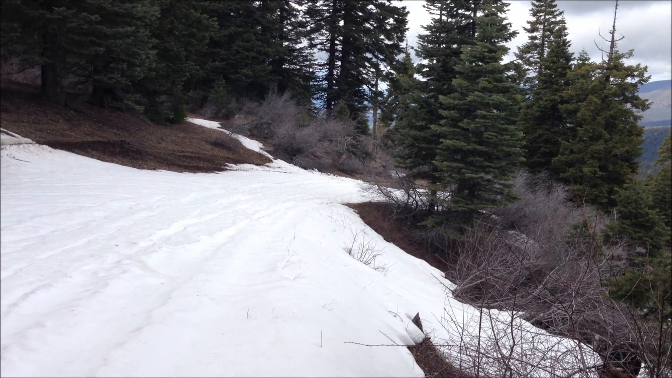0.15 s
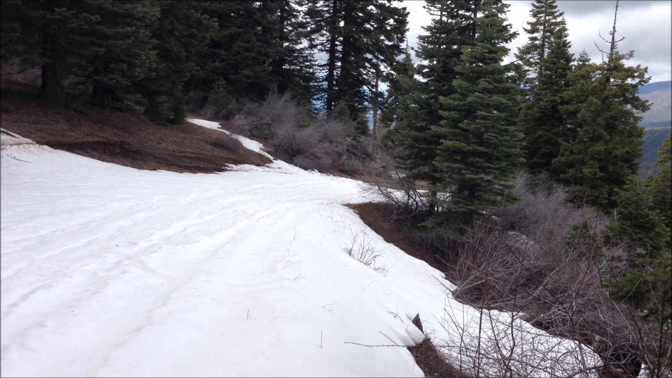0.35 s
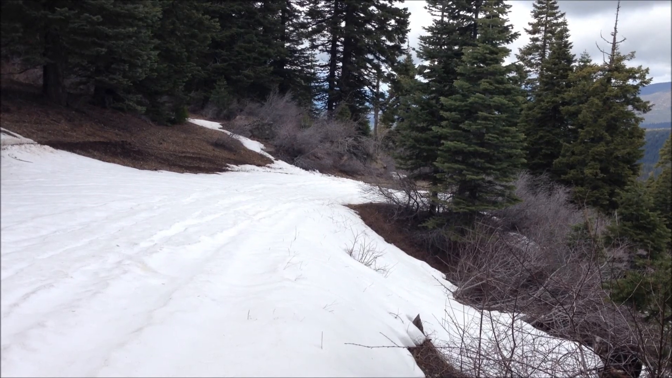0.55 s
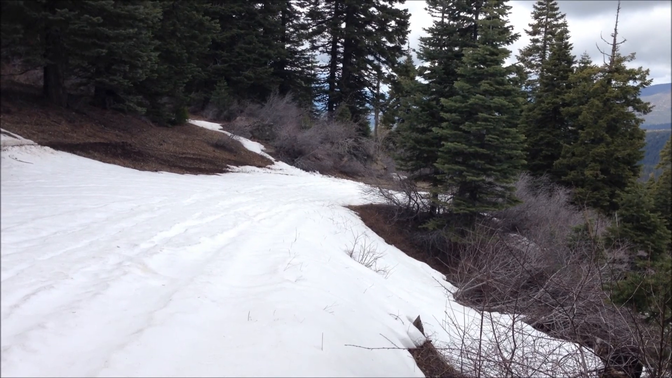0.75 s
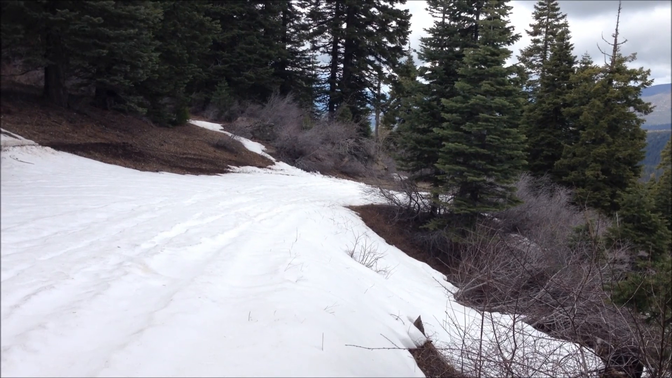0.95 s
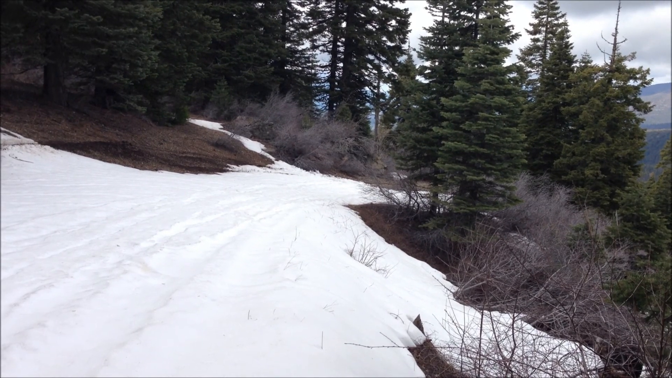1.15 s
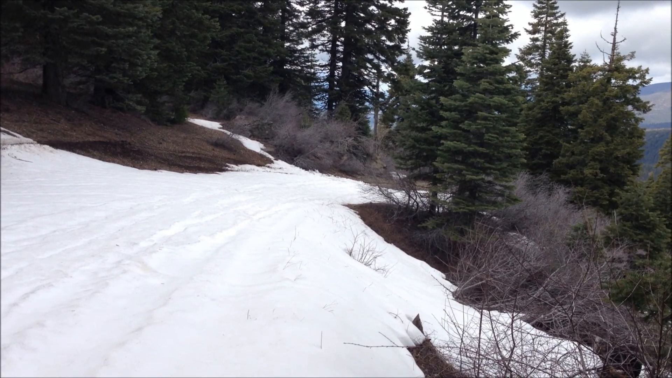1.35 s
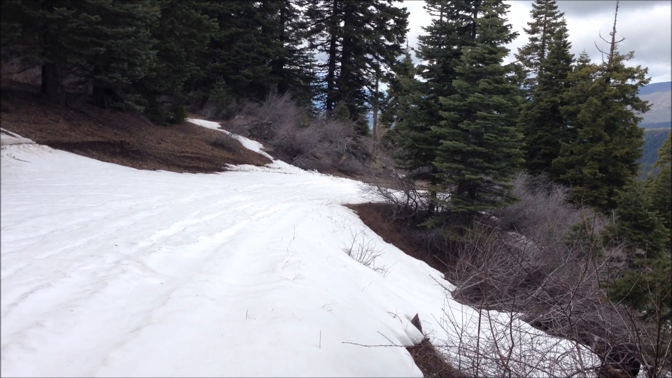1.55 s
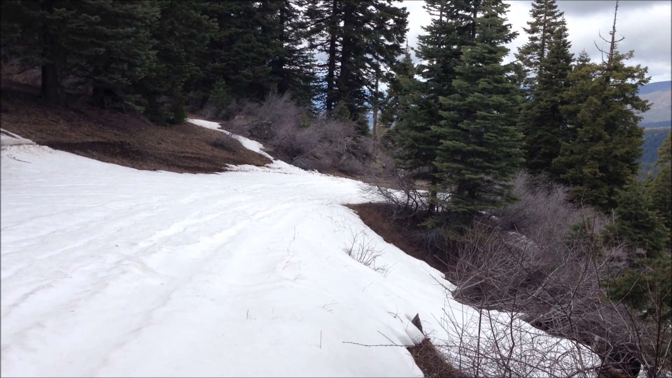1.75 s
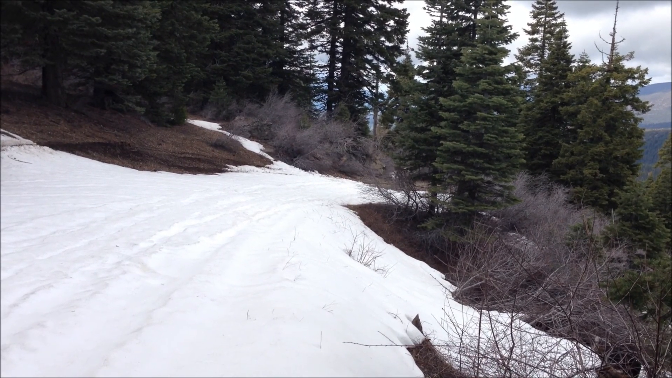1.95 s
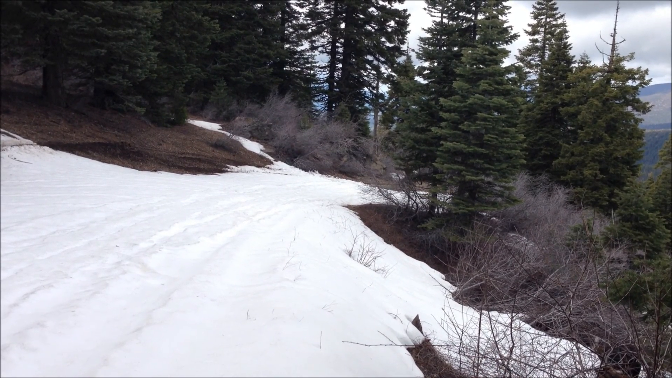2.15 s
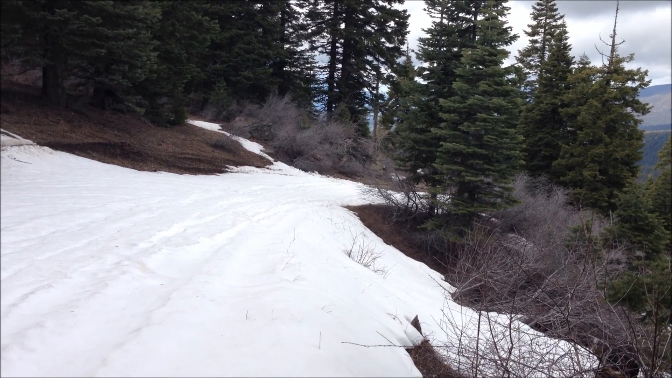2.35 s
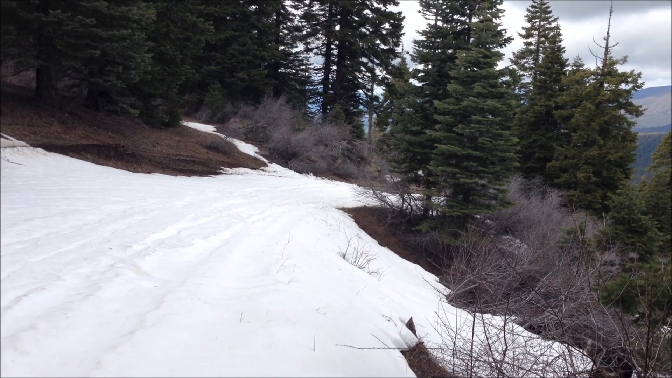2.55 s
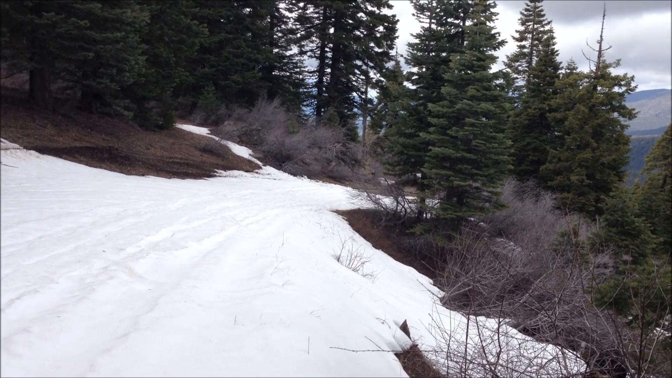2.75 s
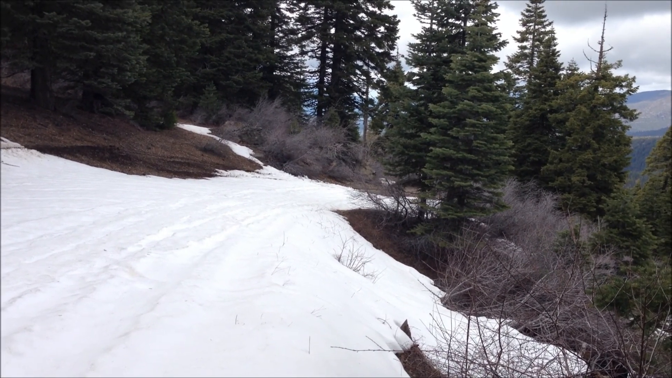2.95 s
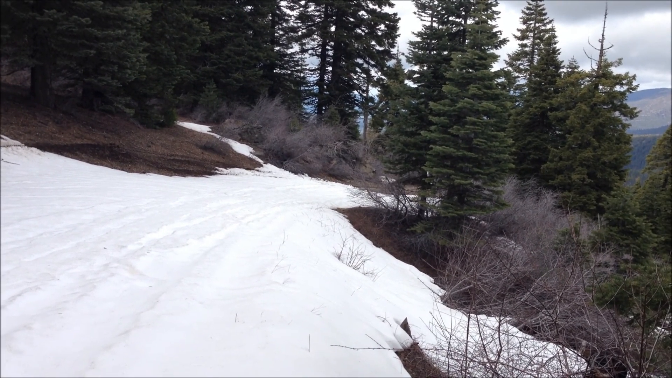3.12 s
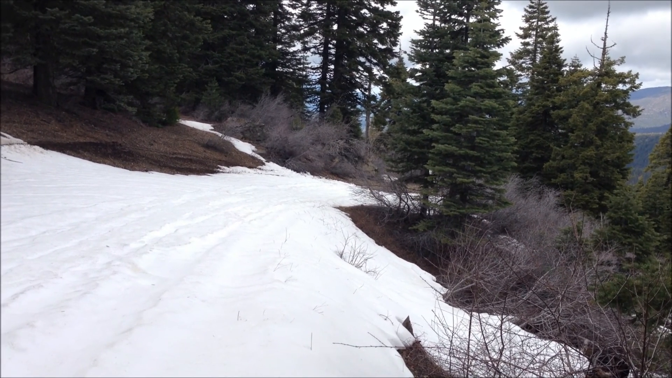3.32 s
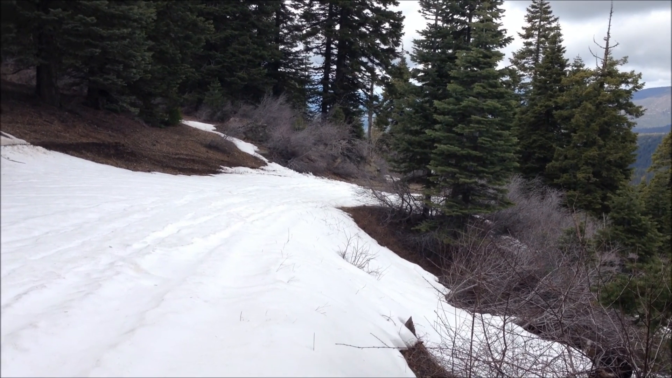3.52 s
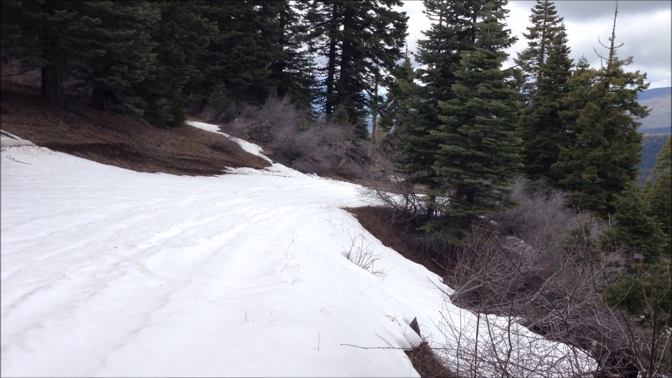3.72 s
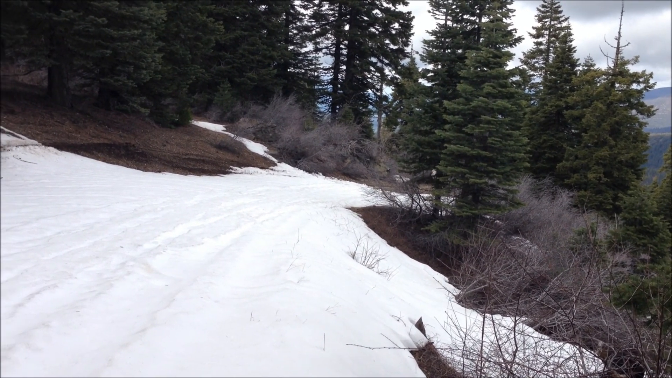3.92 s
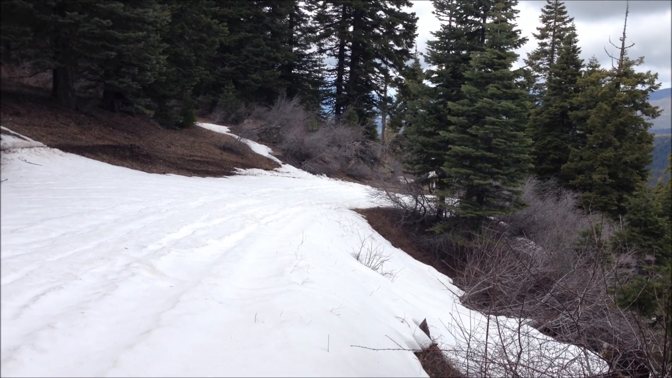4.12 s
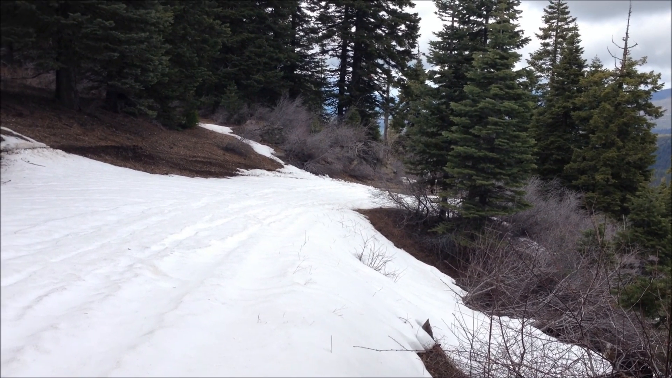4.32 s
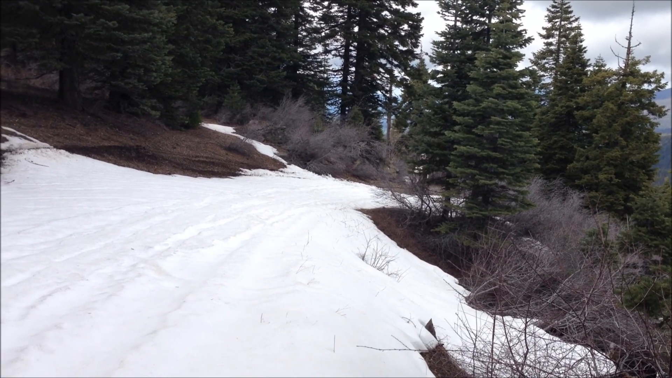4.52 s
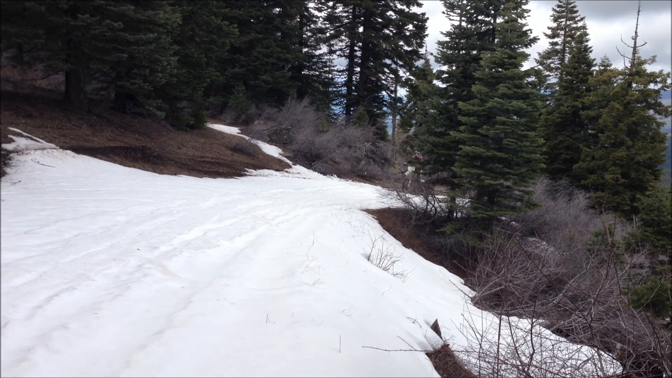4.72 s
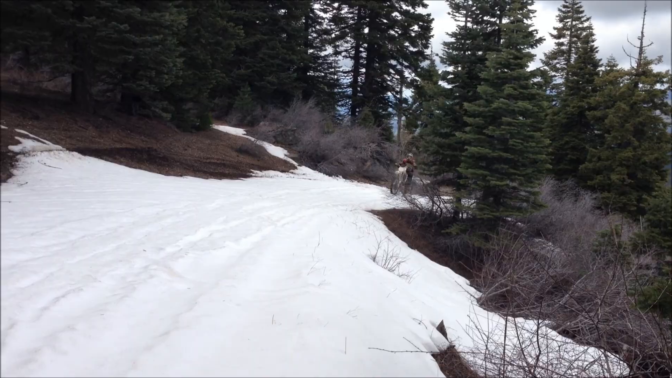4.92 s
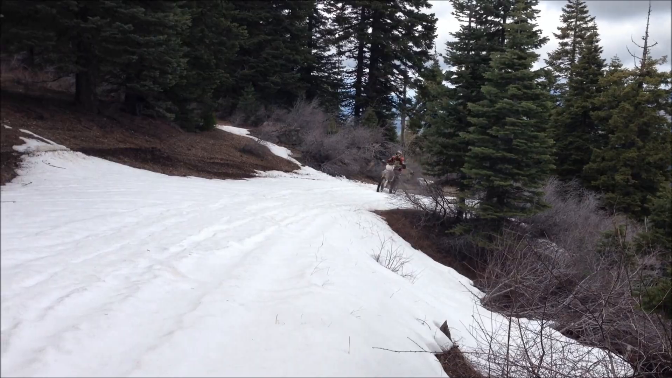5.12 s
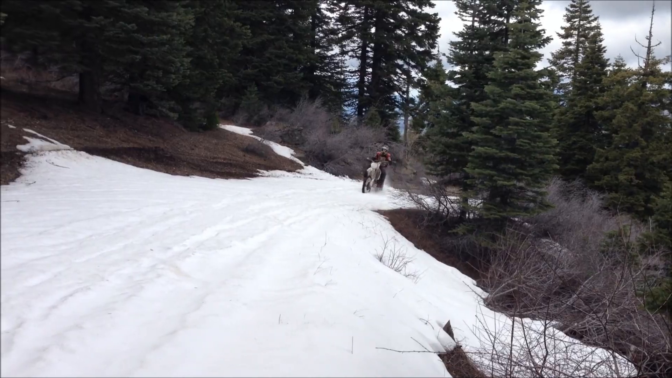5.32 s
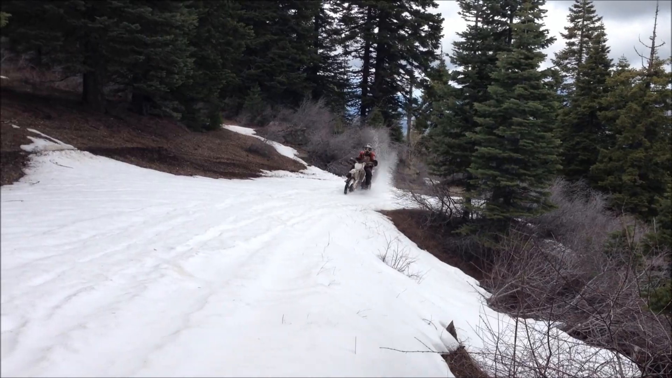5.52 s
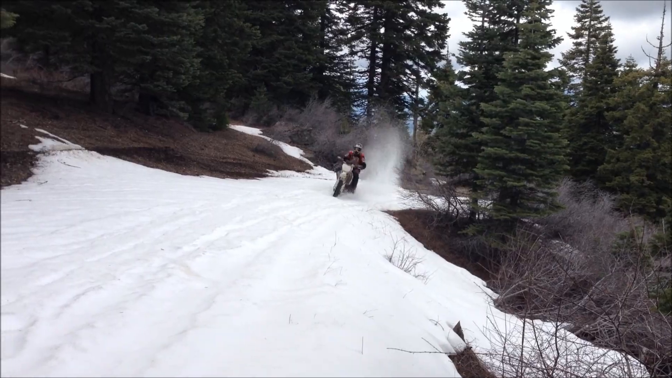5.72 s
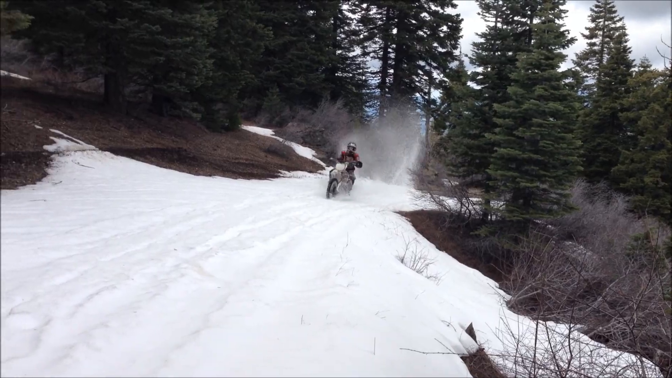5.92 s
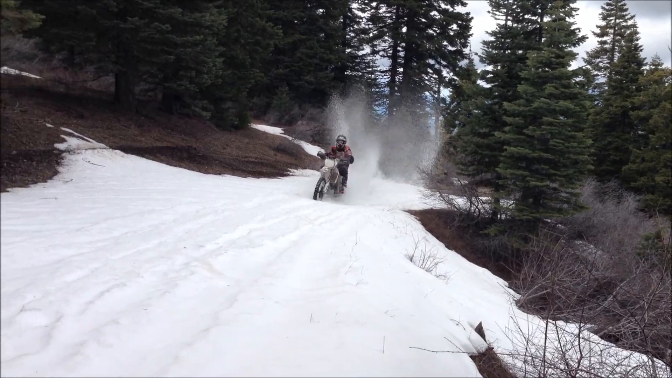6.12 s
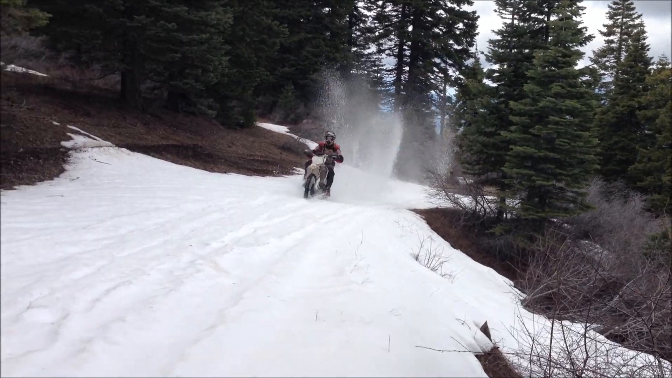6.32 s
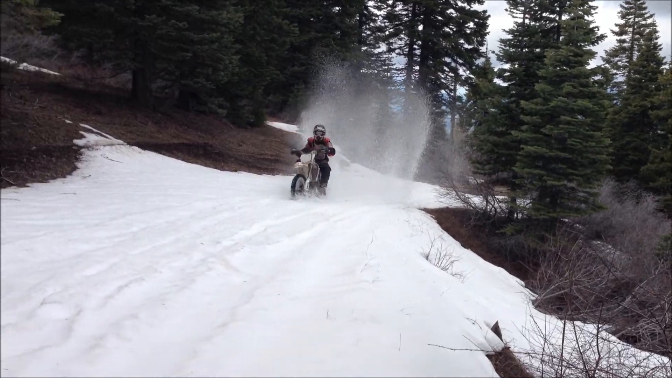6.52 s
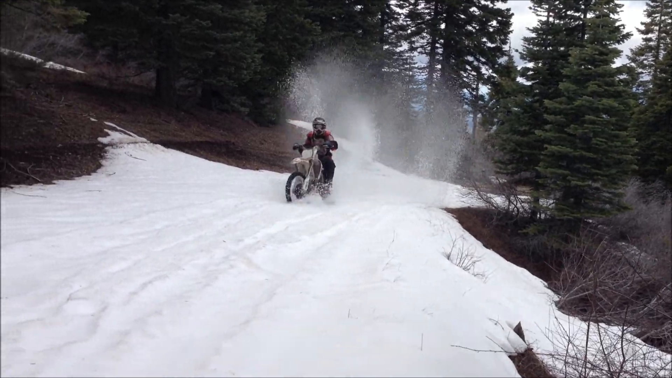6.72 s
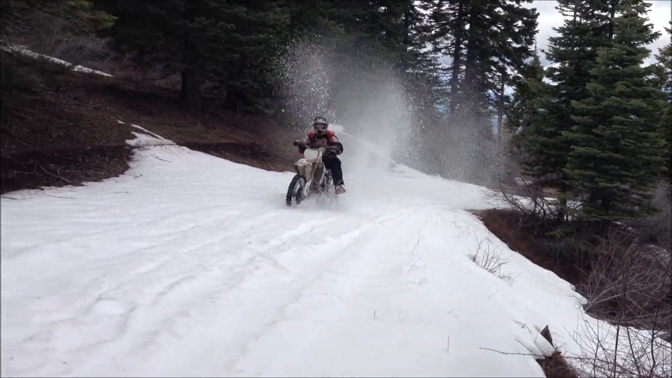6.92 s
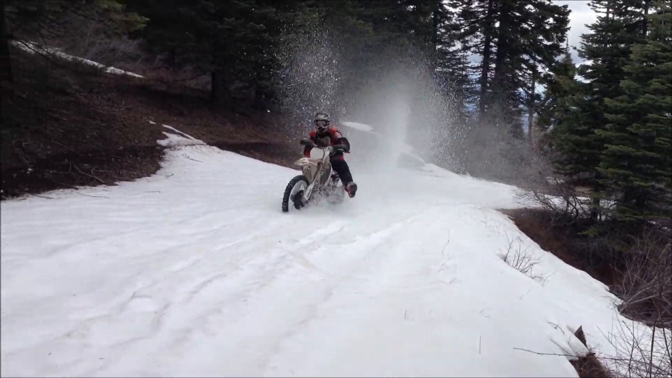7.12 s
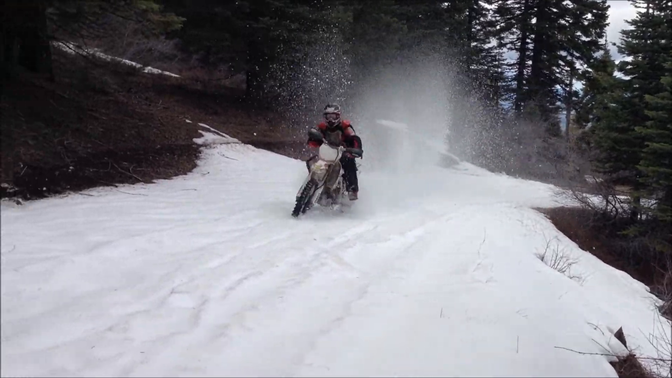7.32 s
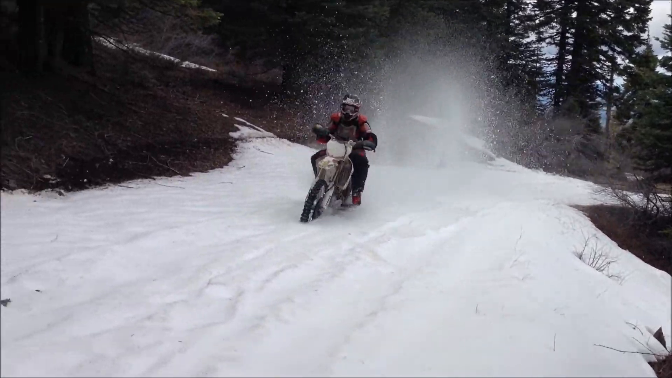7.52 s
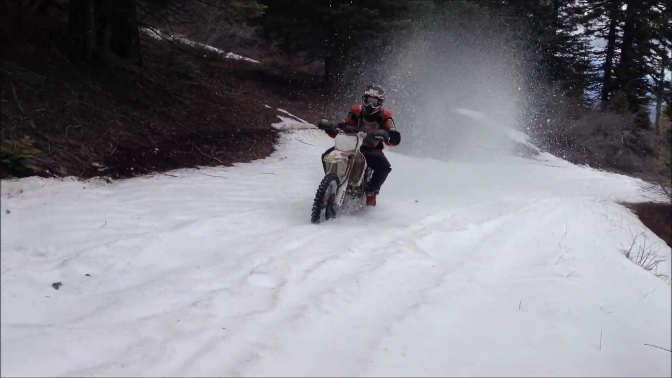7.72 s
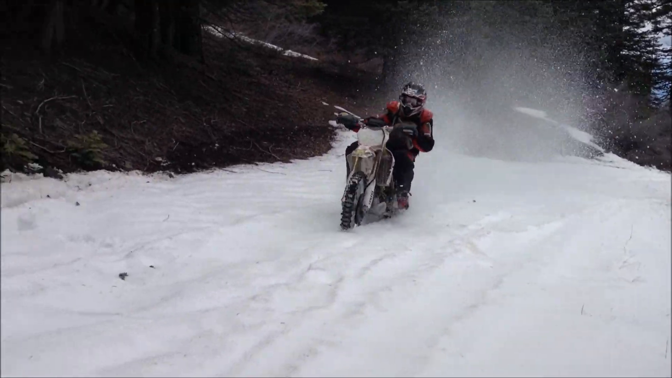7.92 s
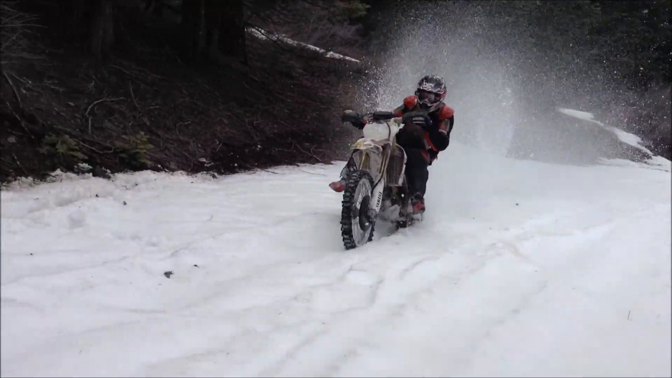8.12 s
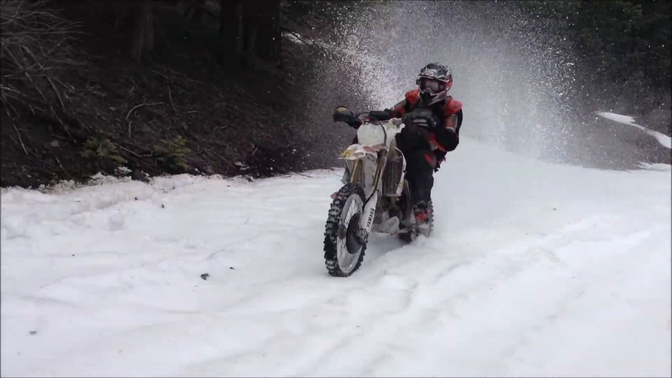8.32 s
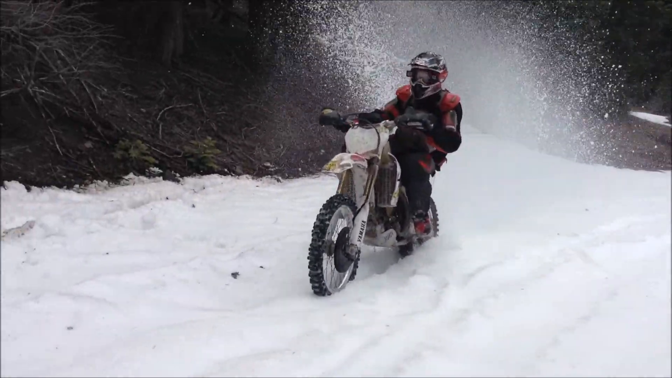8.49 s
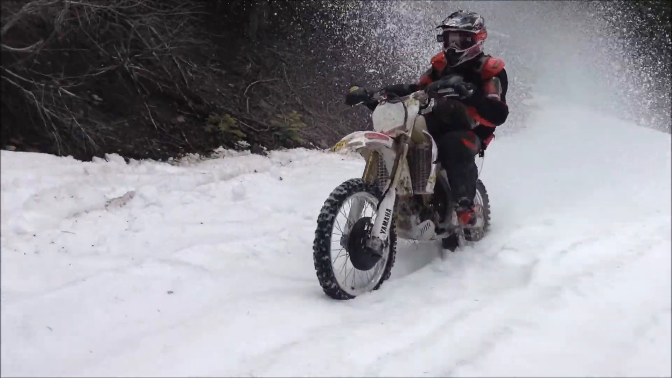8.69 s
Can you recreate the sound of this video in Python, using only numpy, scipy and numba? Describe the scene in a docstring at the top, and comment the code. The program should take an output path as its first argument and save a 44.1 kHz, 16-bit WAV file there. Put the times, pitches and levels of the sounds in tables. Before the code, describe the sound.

Distant single-cylinder dirt bike on a snowy forest trail, first very faint and lumpy, with slow low puttering and short blips. A strong rev near four seconds and a pop just before five lead into fast, even, raspy revving with gear whine and spraying snow. It grows steadily louder until close. Mono outdoor microphone, trees echoing at first, faint hiss underneath.

```python
"""A single-cylinder four-stroke dirt bike climbs a snowy forest trail toward a mono microphone.
First it runs slow and lumpy with short revs, each cycle an exhaust bark and rasp, then about 6 ms later a low intake
thump and snort; gas, casing and thrown snow are filtered noise, gears are sines. A pop cracks in the pipe just
before 5 s. Then it revs fast, even and ever louder, with whining gears, as the forest echo, a decaying noise tail,
fades. Delayed copies return from snow and bank throughout, over faint microphone hiss."""
import sys
import numpy as np
from scipy import signal
from scipy.io import wavfile
from scipy.ndimage import uniform_filter1d
from numba import njit

SR = 44100
rng = np.random.default_rng(int(sys.argv[2]) if len(sys.argv) > 2 else 0)


def nominal_scale(level):
    """Amplitude ratio for a level in decibels (scalar or array-like)."""
    x = np.asarray(level, float) / 20
    return 10 ** x


def master(y):
    """Save y as 16-bit WAV."""
    cut = np.clip(np.atleast_2d(y).T, -1, 1)
    pcm = np.round(cut * 32767)  # scale
    wavfile.write(sys.argv[1], SR, pcm.astype(np.int16))


N = 386035  # samples

SMEAR = 0.55  # share of noise that uneven burning gives to the notes
STEADY = 8  # exponent: upper overtones and gear whine need steady firing


def level(x, db=0):
    """Normalisation: scale to an rms level in dB."""
    return x * nominal_scale(db) / np.sqrt(np.mean(x ** 2))


@njit
def svf(x, hz, width):
    """Second-order resonance: a state-variable band-pass with gain 1 at the centre."""
    y, band, low = np.empty(len(x)), 0., 0.
    g, damping = np.tan(np.pi * hz / SR), width / hz
    for i in range(len(x)):
        v = (band + g * (x[i] - low)) / (1 + g * (g + damping))
        band, low, y[i] = 2 * v - band, low + 2 * g * v, damping * v
    return y


def ring(x, modes):
    """Modal superposition at rms 1; neighbours take opposite signs so the valleys stay filled."""
    total = 0
    for k, (hz, width, db) in enumerate(modes):
        total = total + (-1) ** k * nominal_scale(db) * svf(x, 1. * hz, max(20., 1. * width))
    return level(total)


def ring_twice(x, modes):
    """Cascaded resonance: a second pass steepens the skirts."""
    return ring(ring(x, modes), modes)


def walk(rate):
    """Band-limited fluctuation: random values held 1 / rate s and slewed twice; spread near 1."""
    k = int(SR / rate)
    held = np.repeat(rng.standard_normal(N // k + 1), k)
    return 0.65 * uniform_filter1d(uniform_filter1d(held, k), k)[:N]


def curves(table):
    """Linear interpolation: the columns of a timed table, one value a sample."""
    s, *columns = np.transpose(table)
    return [np.interp(np.arange(N) / SR, s, column) for column in columns]


def pulses(turns, hz, uneven, jitter_ms=0.8, scatter_db=5.5):
    """Cyclic impulse train: a click at each whole cycle; unevenness scales its jitter and scatter."""
    at = np.interp(np.arange(max(np.ceil(turns[0]), 0), turns[-1]), turns, np.arange(N))
    lateness, strength = rng.standard_normal((1000, 2))[:len(at)].T
    rough = uneven[at.astype(int)]
    at = np.clip(at + jitter_ms * SR / 1000 * rough * lateness, 0, N - 2)
    size = nominal_scale(scatter_db * rough * strength)
    # each click is shared between two samples
    clicks, i = np.zeros(N), at.astype(int)
    np.add.at(clicks, i, size * (1 - at + i))
    np.add.at(clicks, i + 1, size * (at - i))
    return clicks / np.sqrt(hz)  # the same power at any speed


def puffs(clicks, hz, decay_ms, steady):
    """Modulated turbulence: noise power jumps at each click and decays, over a steady part."""
    pole = np.exp(-1000 / (decay_ms * SR))
    power = signal.lfilter([1 - pole], [1, -pole], clicks / np.sqrt(hz)) * SR
    return np.sqrt(steady + power) * rng.standard_normal(N)


def bike(hz, uneven, db):
    """Source superposition: cyclic pulses and gas noise drive the resonances of every voice."""
    turns = np.cumsum(hz) / SR  # engine cycles, one firing each
    exhaust = pulses(turns, hz, uneven)
    intake = intake_strokes(turns, hz, uneven)
    gas = puffs(exhaust, hz, 15, 0.22)
    # uneven burning turns part of each note into noise
    clear, noisy = np.sqrt(1 - uneven), np.sqrt(uneven)
    smear = SMEAR * noisy
    mix = nominal_scale(db["thump"]) * intake_thump(intake, exhaust, gas, smear)
    mix = mix + nominal_scale(db["snort"]) * intake_snort(intake)
    # the two exhaust voices have the opposite polarity
    mix = mix - nominal_scale(db["bark"]) * exhaust_bark(exhaust, gas, clear, smear)
    mix = mix - nominal_scale(db["rasp"]) * silencer_rasp(exhaust, gas, clear, smear)
    mix = mix + nominal_scale(db["roar"]) * gas_roar(exhaust, hz, clear)
    mix = mix + nominal_scale(db["casing"]) * (casing(exhaust, hz) + gears(turns, clear))
    return mix + nominal_scale(db["spray"]) * snow_spray(turns, hz)


def voices(hz, loud_db, throttle, turn, spin):
    """Log-linear source control: levels follow loudness, throttle, intake turn and wheelspin."""
    # Voices of the bike, by name: (level above loudness at middle settings [dB],
    # slope [dB per unit throttle], slope [dB per unit turn], slope [dB per unit wheelspin])
    voice_slopes = dict(thump=(-8, -8, 20, 0), snort=(-7.5, -6, 5, 0), bark=(-4.5, -8, -6, 0),
                    rasp=(-6, 8, -3, 0), roar=(-13, 8, -3, 3), casing=(-9, 8, -3, 3), spray=(-15, 3, 0, 14))
    db = {}
    for name, (base, by_throttle, by_turn, by_spin) in voice_slopes.items():
        db[name] = loud_db + base + by_throttle * (throttle - .5) + by_turn * (turn - .5) + by_spin * (spin - .5)
    # the snorkel fades at high engine speed, 0.5 dB per Hz above a 76 Hz firing rate
    db["snort"] = db["snort"] - 0.5 * np.maximum(hz - 76, 0)
    return db


def exhaust_bark(exhaust, gas, clear, smear):
    """Pipe resonance: exhaust pulses and turbulent gas excite the low pipe modes."""
    # Exhaust pipe modes: (frequency [Hz], width [Hz], relative level [dB])
    pipe_modes = [(321, 70, 2.5), (474, 210, 3)]
    return clear * ring(exhaust, pipe_modes) + smear * ring_twice(gas, pipe_modes)


def silencer_rasp(exhaust, gas, clear, smear):
    """Cavity resonance: the same pulses and gas excite broad modes of the silencer."""
    # Silencer modes: (frequency [Hz], width [Hz], relative level [dB])
    silencer_modes = [(760, 395, 9), (978, 690, -4)]
    return clear * ring(exhaust, silencer_modes) + 1.35 * smear * ring_twice(gas, silencer_modes)


def gas_roar(exhaust, hz, clear):
    """Jet turbulence and harmonic radiation: pulsed noise, plus upper overtones under steady firing."""
    # Roar modes: (frequency [Hz], width [Hz], relative level in the noise [dB])
    roar_modes = [(1093, 410, 3.5), (1390, 200, 7), (1856, 760, 1.5)]
    turbulence = svf(puffs(exhaust, hz, 18.0, 0.81), 1560.0, 1300.0)
    noise = nominal_scale(3.9 * walk(23)) * ring(turbulence, roar_modes)
    edge = svf(exhaust, 2300.0, 3000.0)
    overtones = 0
    for k, mode in enumerate(roar_modes):
        # groups of upper overtones swell and fade at random, each band separately
        swell = nominal_scale(4 * walk(2.982))
        overtones = overtones + (-1) ** k * swell * ring_twice(edge, [mode])
    return noise + 2 * clear ** STEADY * level(overtones)


def intake_strokes(turns, hz, uneven):
    """Time-delayed periodicity: a second pressure wave follows each firing by a fixed 5.5 ms."""
    late = turns - hz * 0.005546  # lag in s
    # at low speed the turn without a firing thumps too, gone above a 70 Hz firing rate
    idle_share = 0.3 * np.clip(4 * (1 - hz / 70), 0, 1)
    return pulses(late, hz, uneven) + idle_share * pulses(late - .5, hz, uneven)


def intake_thump(intake, exhaust, gas, smear):
    """Helmholtz-like resonance: intake and exhaust pulses excite the low airbox mode."""
    # Airbox mode: (frequency [Hz], width [Hz], relative level [dB])
    airbox_modes = [(167, 123, 0)]
    thump = ring_twice(intake + 0.46 * exhaust, airbox_modes) + 0.0096 * ring(intake, airbox_modes)
    return thump + smear * ring_twice(gas, airbox_modes)


def intake_snort(intake):
    """Duct resonance: intake pulses ring the air in the snorkel."""
    # Snorkel mode: (frequency [Hz], width [Hz], relative level [dB])
    snorkel_modes = [(243, 116, 0)]
    return ring_twice(intake, snorkel_modes)


def casing(exhaust, hz):
    """Structure-borne radiation: firings ring four panels, whose levels wander separately at random."""
    # Panel modes: (frequency [Hz], width before broadening [Hz])
    panel_modes = [(2850, 242), (3400, 440), (4180, 620), (5200, 920)]
    broadening = 1.88
    out = 0
    for (mode_hz, width), panel_db in zip(panel_modes, (-1.5, -2.5, -4, -6)):
        mode = [(mode_hz, broadening * width, 0)]
        blow = puffs(exhaust, hz, 9.2, 2.2) + 1.1 * level(exhaust)  # noisy rattle and direct knock
        wander_db = 3.1 * walk(9) + 2.5 * walk(4)
        out = out + nominal_scale(panel_db + wander_db) * ring_twice(blow, mode)
    return out


def gears(turns, clear):
    """Tooth-mesh tones: sines locked to engine speed come and go, heard when firing is steady."""
    # Gear teeth: (multiple of the firing rate, middle sine amplitude relative to the casing gain [dB])
    tooth_tones = [(32, -4), (38, -8), (45.5, -10)]
    whine = 0
    for multiple, db in tooth_tones:
        phase = 2 * np.pi * multiple * turns + 1.5 * walk(30)
        whine = whine + nominal_scale(db + 7 * walk(5)) * np.sin(phase)
    return clear ** STEADY * whine


def snow_spray(turns, hz):
    """Granular impact noise: thrown snow ticks each cycle in treble bands that flicker separately."""
    # Spray bands: (frequency [Hz], width [Hz], relative level [dB])
    spray_bands = [(5920, 470, -13), (7185, 3560, 3), (9660, 6200, -1), (11700, 13000, -7)]
    spray = 0
    for mode in spray_bands:
        ticks = pulses(turns - .1, hz, np.ones(N), jitter_ms=.4, scatter_db=8)
        flicker_db = 2.3 * walk(9.2) + 0.59 * walk(2.4)
        spray = spray + nominal_scale(mode[2] + flicker_db) * ring_twice(puffs(ticks, hz, 3.0, 4.5), [mode])
    return level(spray)


def pops():
    """Impulsive combustion: unburnt fuel goes off in the pipe as a noise crack and a low boom."""
    # Pops: (time [s], click size before filtering [dB])
    pop_times = [(4.8946, -25)]
    clicks = np.zeros(N)
    for s, db in pop_times:
        clicks[int(s * SR)] = nominal_scale(db)
    crack = signal.lfilter([1], [1, -.99], clicks) * rng.standard_normal(N)
    crack = svf(svf(crack, 3100., 2500.), 3100., 5000.)
    return 5 * crack + 40 * svf(clicks, 170., 60.)


def reflection(x, ms, share):
    """Specular reflection: a later, duller arrival whose path wavers as the bike weaves."""
    t = np.arange(N) / SR
    delay_s = (ms + 0.49 * walk(4.0)) / 1000
    return share * np.interp(t - delay_s, t, svf(x, 790.0, 3800.0))


def trees(x):
    """Diffuse scattering: trunks return a dull decaying wash, fading as the bike leaves the trees."""
    # Forest echo: (time [s], level [dB])
    wash_levels = [(0, -5.5), (4, -7), (5.6, -14), (8.75, -19)]
    t60_s = 1
    t = np.arange(SR) / SR
    tail = svf(rng.standard_normal(SR), 500.0, 2800.0) * 1000. ** (-t / t60_s) * (t > .012)
    wash = signal.fftconvolve(x, tail / np.sqrt(np.sum(tail ** 2)))[:N]
    return nominal_scale(*curves(wash_levels)) * wash


def hiss():
    """Stationary noise floor: microphone hiss in two broad bands, at -60.5 dB rms."""
    # Hiss bands: (frequency [Hz], width [Hz], relative level [dB])
    hiss_bands = [(2330, 2400, 7), (12600, 8900, -10)]
    return nominal_scale(-60.5) * ring(rng.standard_normal(N), hiss_bands)


def scene():
    """Superposition of direct sound, reflections, wash and hiss, the same in both channels."""
    # Engine speed: (time [s], firing rate [Hz])
    speed = [(0, 36.9), (.27, 35.54), (.34, 47.2), (.47, 37.9), (.63, 38.2), (.78, 45), (.97, 43.74),
             (1.24, 44.55), (1.42, 43.87), (1.61, 38.3), (1.85, 36.24), (2.19, 38.4), (2.31, 41.35),
             (2.41, 38.86), (2.51, 41.5), (2.73, 42.76), (2.85, 46.35), (3.17, 50.5), (3.3, 62),
             (3.5, 41.86), (3.7, 44.3), (3.9, 45.28), (4.03, 48.1), (4.14, 78.26), (4.21, 57.97),
             (4.29, 60.22), (4.57, 47.9), (4.8, 43.56), (5.06, 75.34), (5.36, 53), (5.72, 92.3),
             (5.79, 94.9), (5.92, 96.2), (6.02, 100), (6.11, 99.55), (6.24, 91.74), (6.41, 95.5),
             (6.6, 94.9), (6.72, 85.74), (6.9, 92.07), (7.24, 91.1), (7.38, 85.3), (7.54, 90.6),
             (7.7, 90.3), (7.95, 90.16), (8.07, 85.93), (8.33, 79.2), (8.46, 79.6), (8.68, 86.23),
             (8.75, 84.7)]
    # Firing, lumpy at the start and in the revs near 5 s, steadiest in the fast run:
    # (time [s], unevenness [0-1])
    unevenness = [(0, .65), (.6, .5), (.85, .13), (1.45, .13), (1.6, .18), (3.1, .16), (3.3, .3),
                  (3.5, .16), (4, .16), (4.1, .3), (4.9, .42), (5.4, .36), (5.6, .085), (8.75, .065)]
    # The rider: (time [s], loudness [dB], throttle [0-1],
    # intake turned to the microphone [about 0-1], wheelspin [0-1])
    rider = [(0, -66, 0.3, 1, .5), (.14, -54.5, 0.46, 0.9, .4), (.27, -67, 0.4, 0.9, .6),
             (.36, -54, 0.45, 0.6, .4), (.46, -62.5, 0.4, 1.1, .6), (.56, -59, .45, 0.74, .6),
             (.73, -50.5, 0.36, .54, 0.2), (1.2, -50.5, 0.37, 0.46, 0.04), (1.75, -49, 0.41, .65, 0.55),
             (2.5, -45, .46, 0.54, 0.8), (2.95, -42.5, 0.41, 0.58, 0.45), (3.22, -38.5, 0.51, 0.41, 0.62),
             (3.29, -40, 0.6, 0.46, 0.7), (3.36, -36, 0.61, 0.57, 0.55), (3.5, -39, 0.15, .55, 0.52),
             (3.7, -40, 0.4, 0.49, 0.78), (4.02, -36, 0.3, 0.33, 0.25), (4.14, -23, 0.5, 0.49, 0.23),
             (4.23, -31, 0.59, 0.51, 0.34), (4.4, -29.5, 0.7, 0.56, 0.08), (4.56, -33.5, 0.47, 0.71, 0.08),
             (4.68, -33, .55, 0.65, 0.53), (4.78, -35, 0.58, 0.92, 0.4), (4.95, -25.5, 0.85, 0.59, 0.31),
             (5.07, -23, 1, 0.56, 0.14), (5.38, -27.5, 0.77, 0.59, 0.46), (5.51, -21.5, 1, 0.57, 0.15),
             (5.75, -18, 0.83, 0.39, 0.61), (6, -16.5, 0.5, 0.37, 0.5), (6.3, -16.5, .55, 0.34, 0.46),
             (6.63, -15.5, 0.49, 0.36, 0.54), (6.7, -18.5, 0.55, 0.41, 0.52),
             (6.9, -15.5, 0.57, 0.31, 0.66), (7.1, -14, 0.64, 0.3, 0.61), (7.36, -13.5, 0.51, .4, .6),
             (7.72, -12, 0.52, 0.45, 0.65), (7.77, -9.5, .65, 0.74, 0.6), (7.94, -10, 0.56, 0.78, .5),
             (8.02, -12.5, 0.44, 0.82, .5), (8.35, -11, 0.47, 0.92, 0.39), (8.6, -11.5, 0.42, 0.79, 0.54),
             (8.75, -11, 0.37, .7, 0.51)]
    # Extra paths: (time [s], delay by the snow [ms], share by the snow, delay by the bank [ms])
    extra_paths = [(0, 1.68, 0.23, 5.76), (4.5, 0.9, 0.19, 5.87), (5.5, 1.745, 0.11, 6.74),
                   (6.5, 2.74, .33, 7.07), (7, 2.38, 0.43, 7.15), (7.5, 2.61, 0.19, 8.1),
                   (8, 2.566, 0.52, 10), (8.4, 4.33, 0.33, 9.9), (8.75, 4.67, 0.39, 10.3)]
    hz, = curves(speed)
    near = bike(hz, *curves(unevenness), voices(hz, *curves(rider))) + pops()
    snow_ms, snow_share, bank_ms = curves(extra_paths)
    near = near + reflection(near, snow_ms, snow_share)
    near = near + reflection(near, bank_ms, 0.27)
    mono = near + trees(near) + hiss()
    return np.array([mono, mono])


def low_pass(x):
    """Removes everything above the highest recorded frequency."""
    return signal.sosfilt(signal.butter(12, 15350, fs=SR, output="sos"), x)


def record(dry):
    """Band limiting and saturation: the camera cuts bass and top, adds rumble and rounds peaks."""
    loudness = np.sqrt(uniform_filter1d(dry[0] ** 2, 2000))
    # the rumble follows the loudness, over a faint constant floor
    rumble = (nominal_scale(-55) * loudness + nominal_scale(-92)) * level(svf(rng.standard_normal(N), 45., 70.))
    low_cut = signal.butter(5, 112, "high", fs=SR, output="sos")
    top_cut = signal.ellip(8, .2, 70, 15400, fs=SR, output="sos")
    rounded = np.tanh(signal.sosfilt(low_cut, dry) + rumble)
    mix = signal.sosfilt(top_cut, rounded)
    return low_pass(mix)


dry = scene()
out = record(dry)
master(out)
```